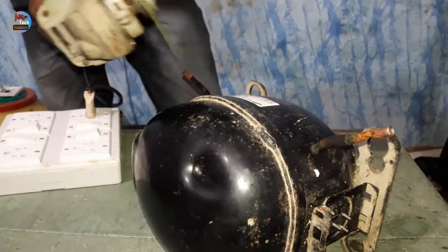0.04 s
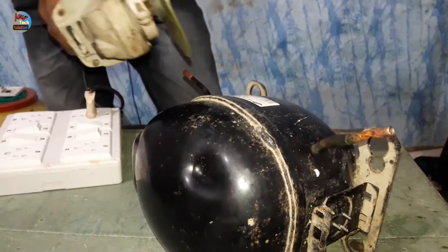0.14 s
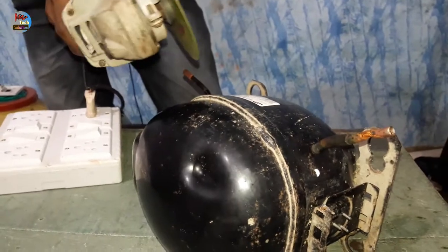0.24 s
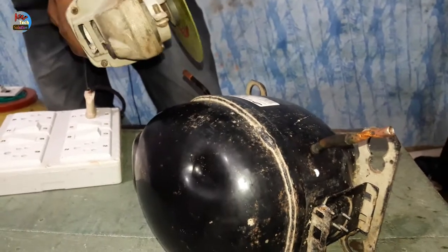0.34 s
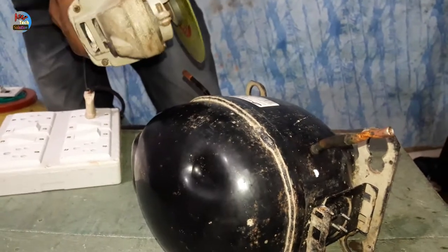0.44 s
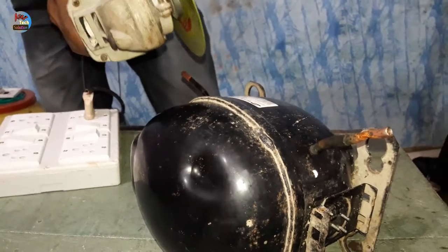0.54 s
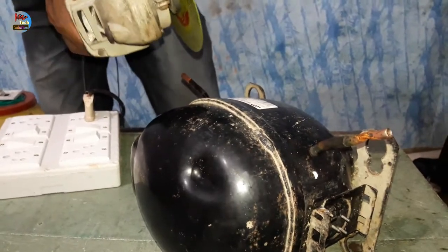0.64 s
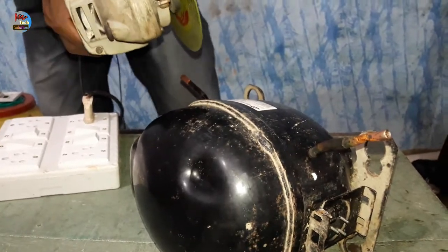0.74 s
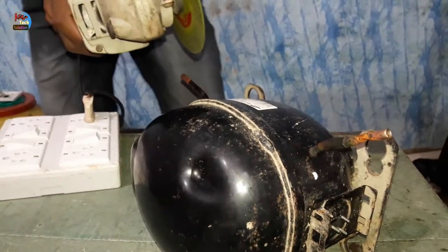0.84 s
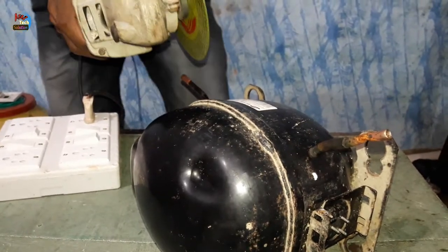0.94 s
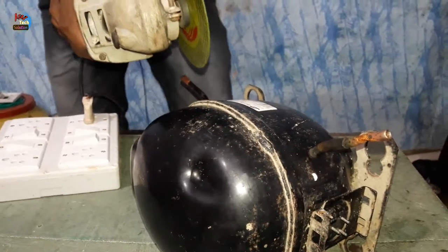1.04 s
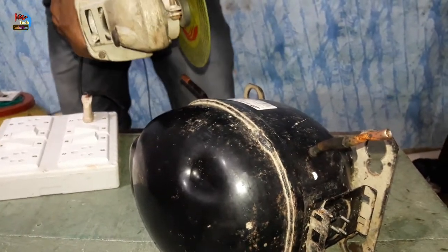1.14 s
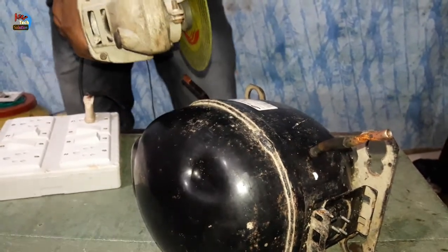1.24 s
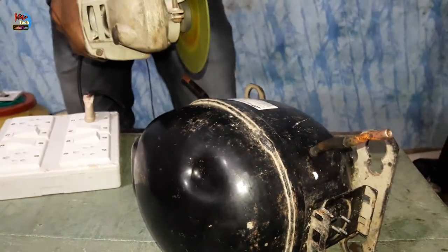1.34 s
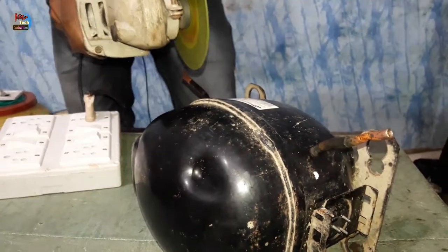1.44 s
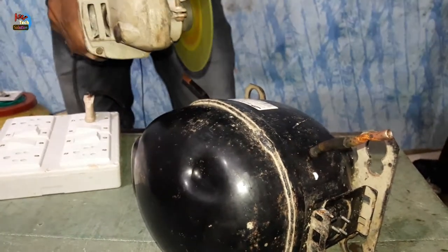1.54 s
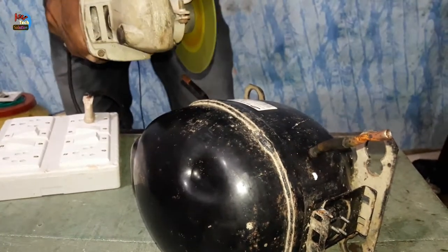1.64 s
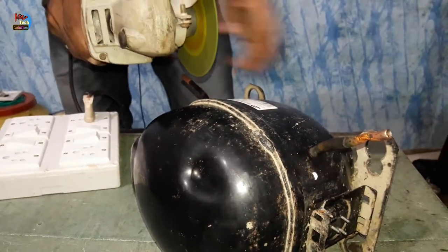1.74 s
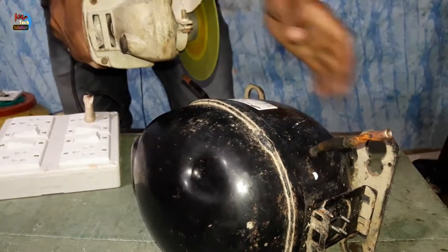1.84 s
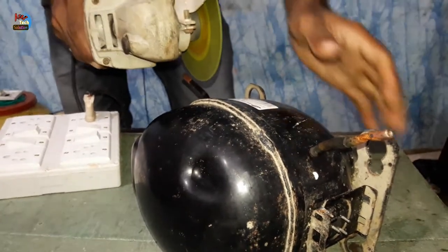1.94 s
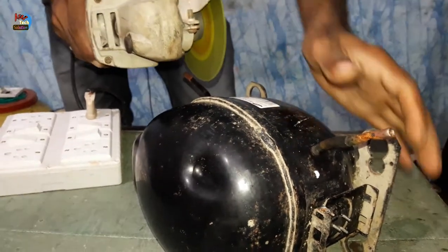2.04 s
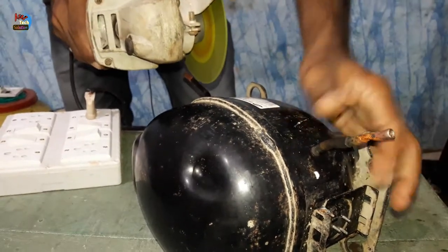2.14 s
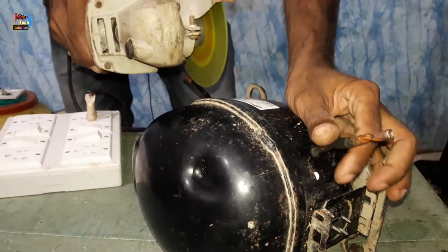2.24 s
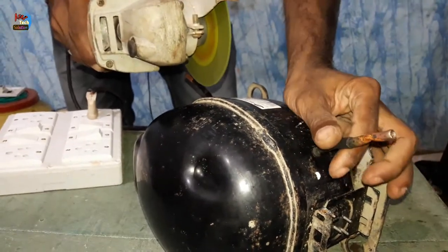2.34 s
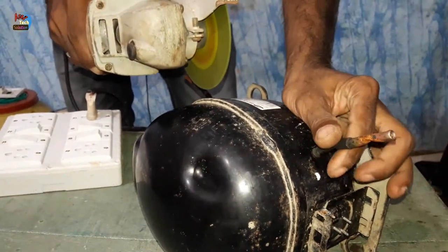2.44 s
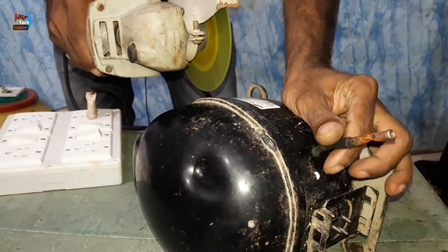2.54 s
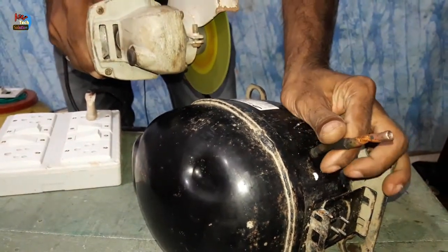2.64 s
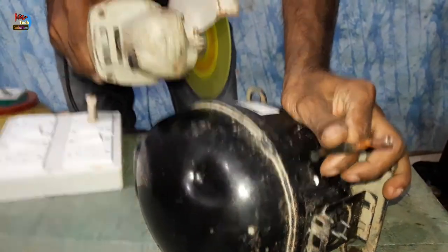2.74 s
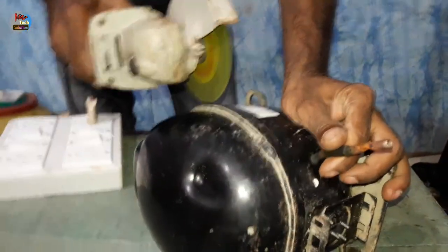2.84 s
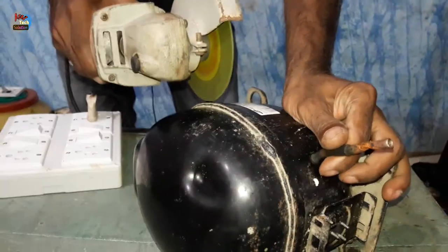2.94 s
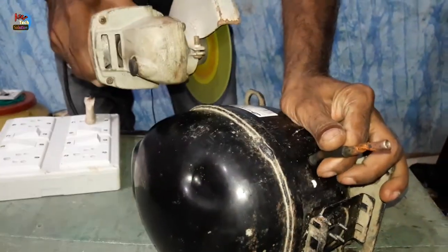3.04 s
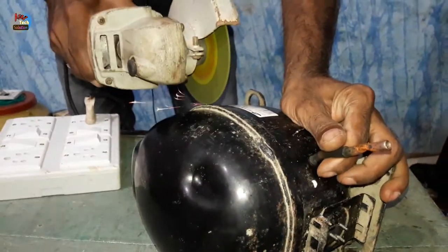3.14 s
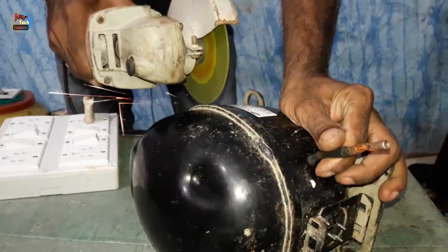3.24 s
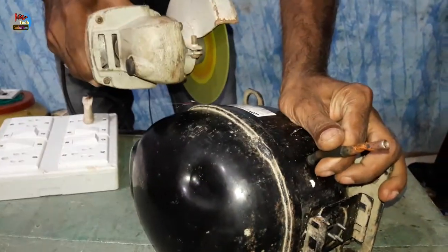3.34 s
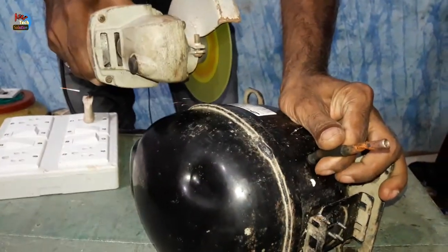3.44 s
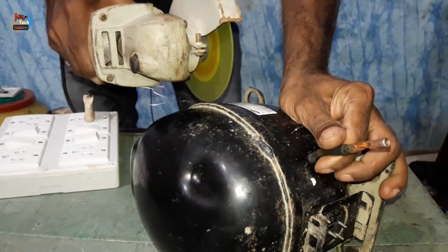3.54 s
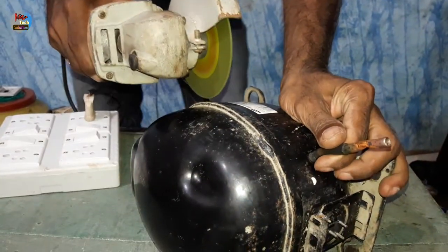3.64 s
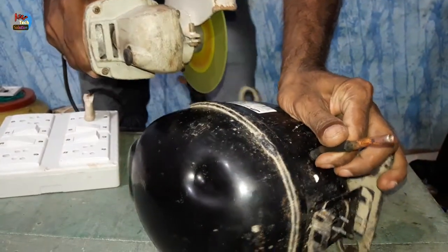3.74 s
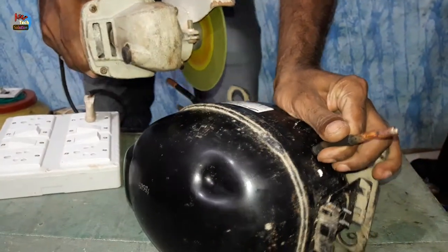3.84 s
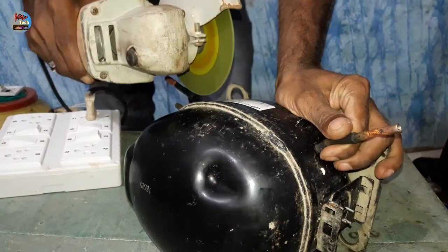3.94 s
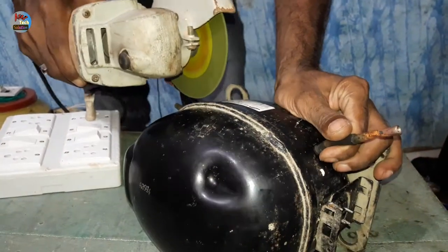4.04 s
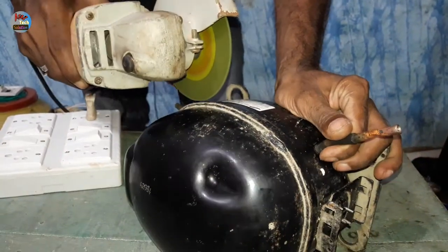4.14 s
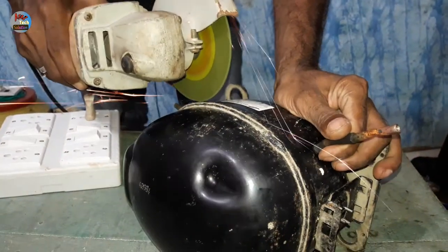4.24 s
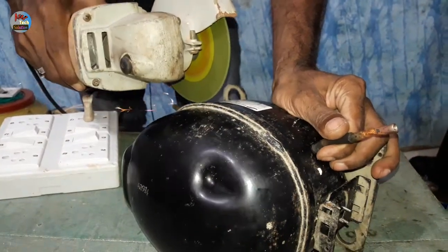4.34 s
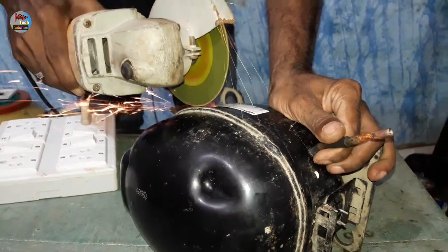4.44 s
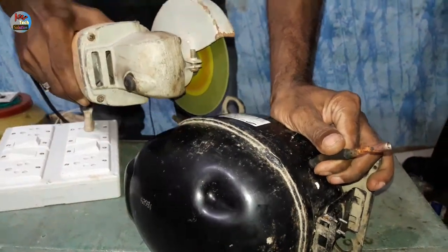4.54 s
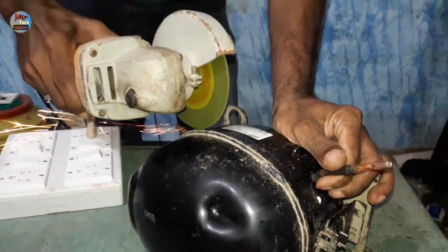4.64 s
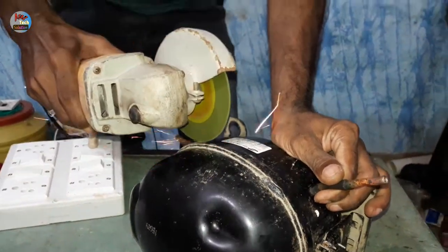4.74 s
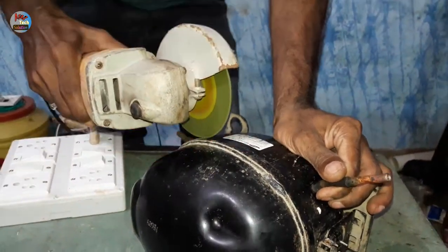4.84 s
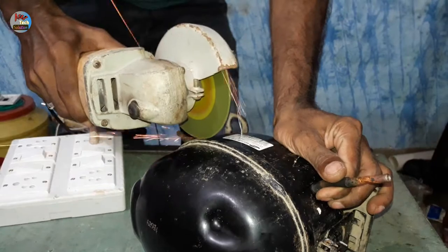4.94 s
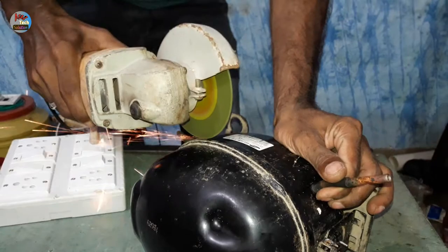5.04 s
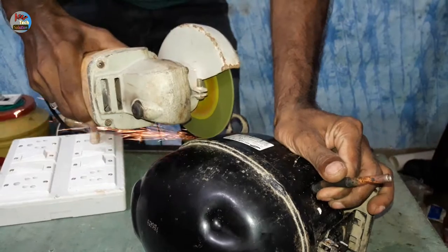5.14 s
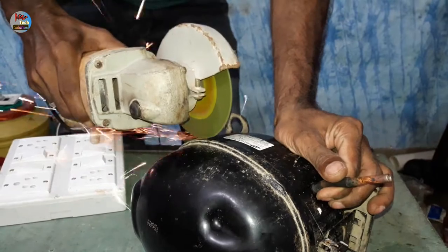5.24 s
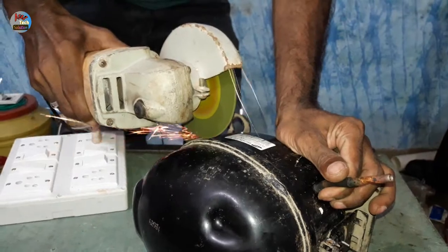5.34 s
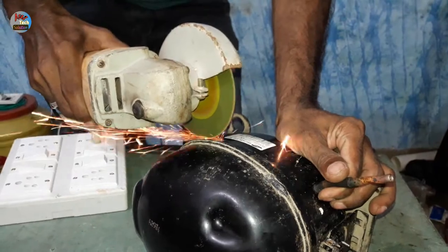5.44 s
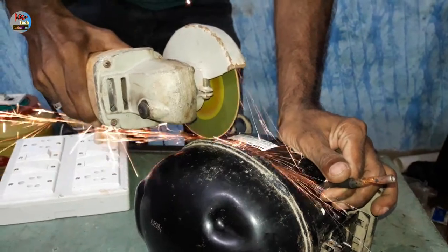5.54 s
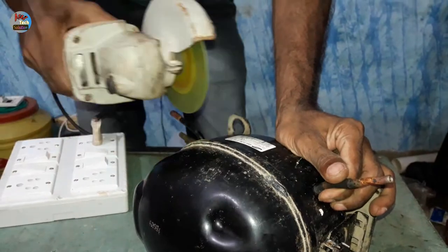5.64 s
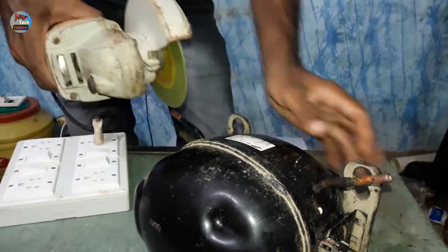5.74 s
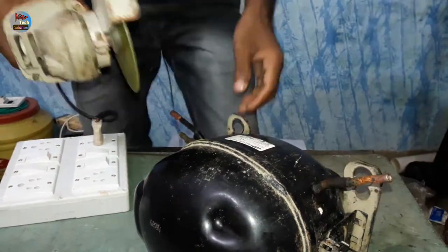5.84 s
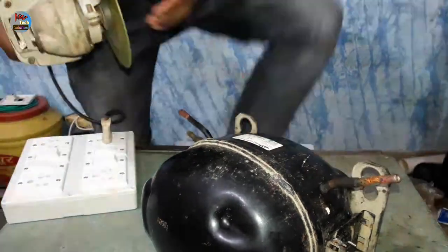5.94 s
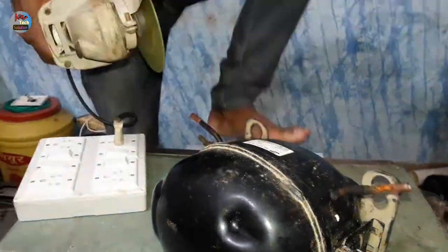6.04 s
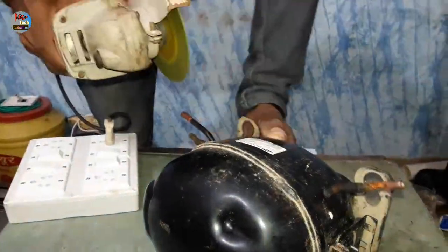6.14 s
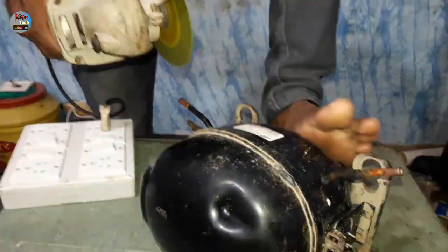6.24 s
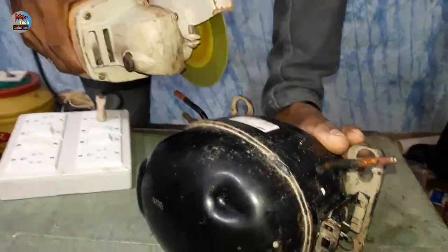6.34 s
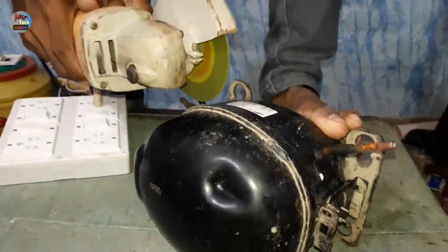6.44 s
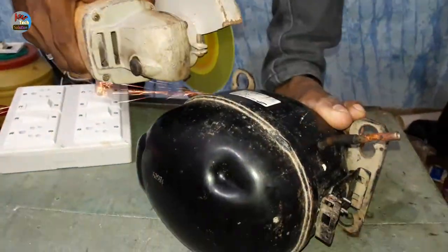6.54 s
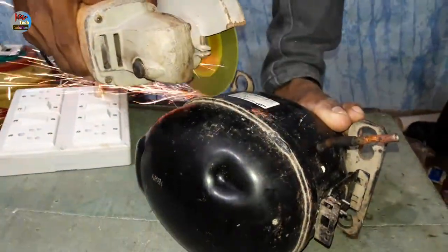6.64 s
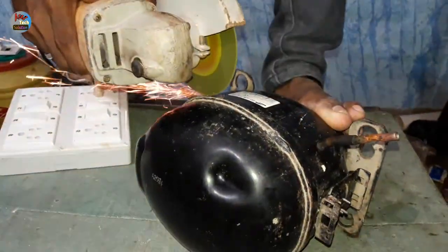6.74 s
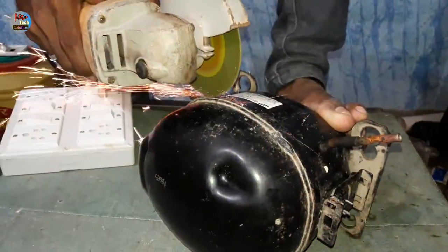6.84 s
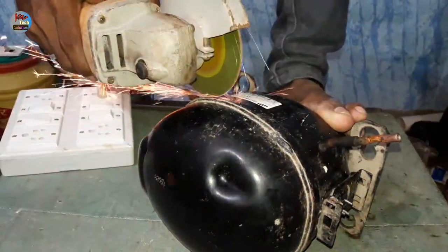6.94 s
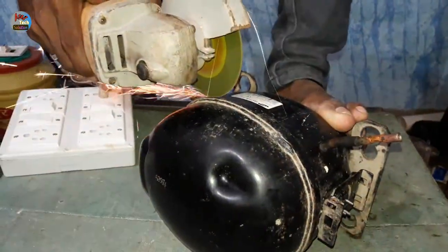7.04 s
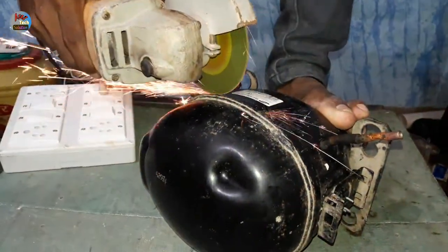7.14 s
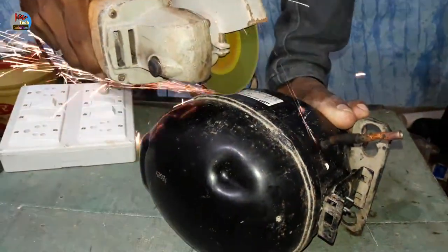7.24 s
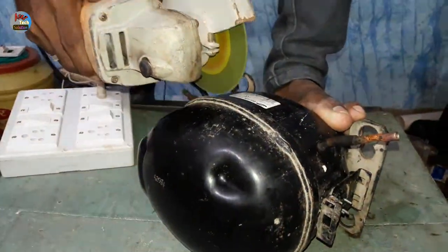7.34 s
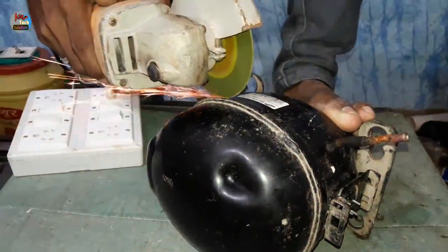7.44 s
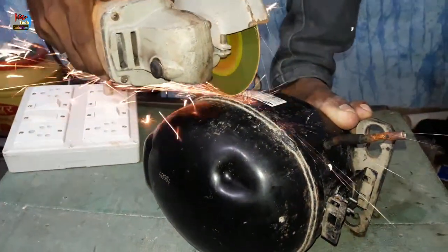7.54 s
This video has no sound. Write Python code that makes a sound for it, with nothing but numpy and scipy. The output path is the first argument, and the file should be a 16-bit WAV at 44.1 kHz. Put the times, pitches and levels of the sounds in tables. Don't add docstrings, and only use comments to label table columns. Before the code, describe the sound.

Quiet hum and faint hand ticks, then a power grinder starts with rattling gears, squeaks and whines, and repeatedly bites a hollow metal shell.

```python
import sys
import numpy as np
from scipy import signal
from scipy.fft import rfft, irfft
from scipy.io import wavfile
from scipy.ndimage import uniform_filter1d, minimum_filter1d, map_coordinates

SR = 44100
rng = np.random.default_rng(int(sys.argv[2]) if len(sys.argv) > 2 else 0)


def pcm_store(signal):
    levels = np.round(np.clip(np.atleast_2d(signal), -1, 1) * 32767)
    wavfile.write(sys.argv[1], SR, levels.astype(np.int16).T)


def gain_from_decibels(decibels):
    exponent = np.asarray(decibels, float) / 20
    return 10 ** exponent


N = 335160
TIME = np.arange(N) / SR
START_S = 1.2688


def rms_one(x):
    return x / np.sqrt(np.mean(x ** 2) + 1e-20)


def in_time(rows):
    s, *columns = np.transpose(rows)
    return [np.interp(TIME, s, column) for column in columns]


def coloured(x, spectrum):
    hz, level_db = np.transpose(spectrum)
    grid_hz = np.maximum(np.arange(N // 2 + 1) * SR / N, 1)
    shape_db = np.interp(np.log(grid_hz), np.log(hz), level_db, -90, -90)
    return rms_one(irfft(rfft(x) * gain_from_decibels(shape_db), N))


def drift(rate_hz):
    r = np.exp(-2 * np.pi * rate_hz / SR)
    wander = signal.lfilter([1], [1, -2 * r, r * r], rng.standard_normal(N + SR))
    return rms_one(wander[SR:])


def grains(per_s, spread_db):
    sizes = gain_from_decibels(spread_db * np.minimum(rng.exponential(1, N), 5)) * rng.choice([-1, 1], N)
    return sizes * (rng.random(N) < per_s / SR)


def resonances(x, modes):
    out = 0
    for k, (hz, width_hz, level_db) in enumerate(modes):
        r = np.exp(-np.pi * width_hz / SR)
        b = [(1 - r * r) / 2, 0, (r * r - 1) / 2]
        a = [1, -2 * r * np.cos(2 * np.pi * hz / SR), r * r]
        out = out + (-1) ** k * gain_from_decibels(level_db) * signal.lfilter(b, a, x)
    return rms_one(out)


def filtered(x, order, hz, kind="low"):
    return signal.sosfilt(signal.butter(order, hz, kind, fs=SR, output="sos"), x)


def add(track, at_s, piece):
    i = round(at_s * SR)
    track[i:i + len(piece)] += piece[:N - i]


def touching(rows, fade_s):
    return np.clip(np.minimum(TIME - rows[0][0], rows[-1][0] - TIME) / fade_s, 0, 1)


def delayed(x, lag_ms):
    return map_coordinates(x, [np.arange(N) - lag_ms * SR / 1000], order=3)


RUN_UP_S, ROLLING_SHARE = .2, .075


def spun_up():
    return 1 - (1 - ROLLING_SHARE) * np.exp(-np.maximum(TIME - START_S, 0) / RUN_UP_S)


# (time [s], length [s], disc ring [dB], shell ring [dB], loss of speed [%])
CUTS = [
    (3.198, 0.15, -30, -60, 0.44),
    (4.237, 0.3, -37.5, -43.5, 4.2),
    (4.668, 0.24, -37, -48, 2.32),
    (4.995, 0.31, -35.5, -47.5, 2.8),
    (5.267, .41, -35, -44, 5.7),
    (6.664, 0.3, -35, -43, 5.0),
    (6.908, 0.44, -33, -44, 8.9),
    (7.472, 0.24, -33, -42.5, 1.2),
]
BITE_S, LIFT_S, BITE_DB = .09, .022, -8
SAG_S = 0.0505


def pressure():
    disc, shell, load, loss = np.zeros((4, N))
    for s, length_s, disc_db, shell_db, percent in CUTS:
        touch = np.clip(np.minimum(TIME - s, s + length_s - TIME) / LIFT_S, 0, 1)
        bite = touch * gain_from_decibels(BITE_DB * np.exp(-np.maximum(TIME - s, 0) / BITE_S))
        disc, shell = disc + bite * gain_from_decibels(disc_db), shell + touch * gain_from_decibels(shell_db)
        load, loss = load + touch, loss + touch * percent / 100
    keep = np.exp(-1 / (SAG_S * SR))
    return disc, shell, np.minimum(load, 1), signal.lfilter([1 - keep], [1, -keep], loss)


# (frequency [Hz], level [dB per Hz])
SHOP_FLOOR = [(35, -37), (60, -10), (93, -10.5), (226, -11.5), (266, -15), (443, -6), (533, -15),
              (599, -13), (1100, -22.5), (1290, -23), (3580, -29), (3930, -28), (4320, -28), (9510, -32),
              (15500, -50)]
# (frequency [Hz], width [Hz], level [dB])
FAR_FAN = [(4000, 90, -3), (5140, 80, -12), (2800, 200, -12), (8700, 120, -16)]
# (frequency [Hz], rms level [dB])
HUM = [(48.4, -65), (143, -74), (272, -70.5), (339, -70.5), (385, -76), (493, -63.5), (543, -61),
       (4016, -75), (3870, -86), (5141, -85), (2794, -81)]
LATE_HUM = [(3050, -76), (2670, -79), (2891, -80), (3871, -86), (5146, -84), (6320, -81)]
# (time [s], level [dB])
GRIP = [
    (0.57, -76),
    (0.64, -60),
    (.69, -61),
    (.75, -58),
    (.82, -61),
    (0.88, -64),
    (0.92, -68),
    (1.0, -68),
]
# (frequency [Hz], level [dB per Hz])
GRIP_COLOUR = [(410, -36), (700, -8), (829, -12), (896, -8), (1430, -8), (1670, -7), (2140, -11),
               (4900, -10.5), (15600, -30)]
# (time [s], peak level [dB], pitch [Hz], time to fade by 60 dB [s])
TICKS = [
    (0.29, -60, 4100, 0.04),
    (0.392, -44.5, 3300, 0.016),
    (0.393, -48, 5050, 0.01),
    (0.666, -50, 1170, 0.04),
    (0.63, -52, 1940, 0.04),
    (0.667, -45, 1980, 0.037),
    (0.779, -50, 1830, 0.04),
    (0.946, -49, 4030, 0.008),
    (1.15, -42.5, 1110, 0.07),
    (1.171, -43, 700, 0.04),
]


def workshop():
    out = gain_from_decibels(-61 + drift(16)) * coloured(rng.standard_normal(N), SHOP_FLOOR)
    out += gain_from_decibels(-75) * resonances(rng.standard_normal(N), FAR_FAN)
    late = np.clip((TIME - 1.0) / .08, 0, 1)
    for lines, present in ((HUM, 1), (LATE_HUM, late)):
        for hz, level_db in lines:
            tone = np.sin(2 * np.pi * hz * TIME + hz / 8000 * drift(25))
            out += present * np.sqrt(2) * gain_from_decibels(level_db + 1.4 * drift(4.6)) * tone
    slide = coloured(grains(9000, spread_db=-3.0), GRIP_COLOUR)
    out += touching(GRIP, fade_s=.04) * gain_from_decibels(in_time(GRIP)[0]) * slide
    t = np.arange(3000) / SR
    cracks = uniform_filter1d(rng.standard_normal((len(TICKS), len(t))), size=14) * 2.0
    for (s, peak_db, hz, t60_s), crack in zip(TICKS, cracks):
        modes = sum(share * np.sin(2 * np.pi * ratio * hz * t)
                    for ratio, share in ((1, 1), (1.62, 0.31), (1.1, 0.78)))
        add(out, s, gain_from_decibels(peak_db - 5 - 60 * t / max(t60_s, .003)) * modes * (1 + .5 * crack))
    snap = uniform_filter1d(rng.standard_normal(len(t)), size=3)
    add(out, START_S - .0025, gain_from_decibels(-33 - 60 * t / .012) * snap)
    return out


# (time [s], bench lag [ms], bench part of the echo [0-1],
# guard facing us [0-1], echo boost [factor], lower guard ring [dB])
POSE = [(1.27, 0.21, 0.9, 0.37, 1.0, -4), (1.6, .26, 0.94, 0.1, 1.1, -5), (2.05, .29, 0.83, 0.3, 1.38, -5),
        (3.92, .3, 0.79, 0.1, 1.04, 0), (3.96, 0.29, 0.62, 0.76, 1.1, 0.5),
        (5.72, 0.29, 0.55, 0.5, 1.22, 0), (5.8, 0.32, 0.5, .7, 1.07, -6), (5.9, 0.27, 0.75, 0.9, 0.87, -5),
        (5.98, 0.21, 0.76, 1, 0.59, -2), (6.12, .21, 0.6, 0.95, 0.85, -4), (6.23, 0.26, 0.7, 1, 1.2, -12),
        (6.38, .262, 0.95, 1.03, 0.99, -12), (6.46, .3, 0.5, 1, 1.1, -9), (6.62, .29, 0.33, 0.8, 1.01, 3.5),
        (7.6, 0.29, 0.14, 0.76, 0.82, -2)]
# (time [s], peak level [dB], pitch [Hz])
THUMPS = [(2.16, -52, 150.2), (2.23, -52, 149.5), (2.72, -52, 90), (2.945, -47, 160), (3.09, -52, 130.2),
          (3.224, -43, 170), (3.292, -50, 170.4), (3.5, -53, 90.4), (3.68, -52, 70.0), (4.47, -57, 110),
          (4.72, -56, 120), (4.83, -51, 120.5), (5.089, -58, 130), (5.55, -51, 105), (6.1, -53, 118),
          (6.3, -57, 120.2), (6.4, -54, 160), (6.74, -48, 150.4), (7.32, -52, 130)]


def bench():
    lumps = rng.standard_normal(N) * gain_from_decibels(1.8 * drift(11))
    out = rms_one(filtered(lumps, 3, [100, 240], "band"))
    idle = gain_from_decibels(-66 - 4.3 * in_time(POSE)[2]) * spun_up() ** 2
    out *= idle + gain_from_decibels(-25) * pressure()[0]
    t = np.arange(3000) / SR
    for s, peak_db, hz in THUMPS:
        swell = t / .004 * np.exp(1 - t / 0.0037)
        add(out, s, gain_from_decibels(peak_db + 2.5) * np.sin(2 * np.pi * hz * t) * swell)
    return out


# (time [s], peak level [dB], ringing pitch [Hz])
SLAMS = [(1.2693, -16, 3460), (1.2918, -15, 4300), (1.3084, -14, 3380), (1.3207, -20, 5000),
         (1.3292, -17, 4440), (1.3586, -15, 4530), (1.3706, -15, 4300), (1.3798, -14, 5460),
         (1.3905, -12, 3140), (1.4, -15, 3360), (1.419, -15, 4300), (1.4295, -15, 3590),
         (1.4394, -14, 3440), (1.4494, -16, 4030), (1.47, -13, 4170), (1.4814, -15, 4120),
         (1.4914, -15, 4330), (1.5008, -16, 4290), (1.5123, -16, 4390), (1.5223, -15, 4340),
         (1.542, -15, 4260), (1.5522, -17, 3540), (1.5612, -13, 4430), (1.5706, -19, 4200),
         (1.5921, -20, 3590), (1.6011, -16, 3330), (1.651, -20, 3660)]
# (time [s], peak level [dB])
CRACKS = [(4.2078, -37), (4.4637, -36), (4.5274, -35), (4.687, -33), (4.7962, -34), (4.8451, -30),
          (4.923, -37), (5.2111, -36), (5.2564, -35), (5.2851, -32), (5.3695, -33), (5.5675, -34),
          (5.639, -30), (5.9112, -34), (6.1317, -35), (6.1911, -37), (6.4809, -35), (6.7495, -31),
          (6.8727, -34), (7.0563, -33), (7.1937, -34), (7.3579, -38), (7.4203, -38), (7.4963, -31)]


def knocks():
    out, t = np.zeros(N), np.arange(900) / SR
    roughness = uniform_filter1d(rng.standard_normal((len(SLAMS), len(t))), size=30)
    for (s, peak_db, hz), rough in zip(SLAMS, roughness):
        ring = np.sin(2 * np.pi * hz * t + 2.7 * rough) * np.minimum(t / .0012, 1)
        add(out, s, gain_from_decibels(peak_db - 2 - 60 * t / 0.017) * ring)
    cracks = np.diff(rng.standard_normal((len(CRACKS), len(t) + 1)))
    for (s, peak_db), crack in zip(CRACKS, cracks):
        add(out, s, gain_from_decibels(peak_db - 10 - 60 * t / .03) * crack)
    return out


# (time [s], peak level [dB], pitch [Hz])
SQUEAKS = [(2.0191, -16, 6280), (2.0793, -14, 6150), (2.1005, -16, 6140), (2.1193, -22, 6290),
           (2.1522, -14, 5920), (2.17, -14, 6300), (2.1981, -18, 6420), (2.2228, -16, 6230),
           (2.2415, -11, 6280), (2.3, -17, 6380), (2.3184, -16, 6410), (2.478, -23, 6540),
           (2.6975, -18, 5573), (2.959, -16.5, 5900), (3.0809, -27, 6090), (3.0996, -14, 5910),
           (3.157, -24, 6170), (3.2263, -12, 6000), (3.24, -13, 6200), (3.2975, -9, 5830),
           (3.5526, -16, 5740), (3.7017, -24, 6470), (3.791, -17, 6420), (3.8708, -15.5, 6240),
           (3.9506, -20, 6400), (4.5056, -17, 6300), (4.8435, -17.5, 6250), (6.3038, -20, 6096),
           (6.7478, -14, 5870), (7.0571, -15, 5754)]
# (time [s], peak level [dB])
SPARKS = [(1.8992, -31), (2.02, -26), (2.041, -24), (2.1008, -36), (2.1187, -26), (2.1521, -32),
          (2.2212, -34), (2.3896, -32), (2.4594, -32), (2.4794, -32), (2.5108, -33), (2.5298, -28),
          (2.6011, -26), (2.6655, -33), (2.6839, -31), (2.7807, -38), (2.8007, -40), (2.8326, -36),
          (2.9265, -34), (2.9598, -28), (2.9922, -31), (3.081, -34), (3.0995, -34), (3.1374, -33),
          (3.1564, -28), (3.2097, -33), (3.2272, -32), (3.2793, -36), (3.297, -26), (3.3424, -28),
          (3.4662, -36), (3.4901, -31), (3.523, -34), (3.553, -35), (3.5834, -32), (3.6014, -30),
          (3.7011, -38), (3.7206, -38), (3.7635, -38), (3.7899, -37), (3.8293, -31), (3.8732, -29),
          (3.9516, -32)]
# (time [s], pitch [Hz])
BRUSH_PITCH = [(1.3, 6220), (4.0, 6210), (5.7, 6350), (6.7, 5700)]
OCTAVE_DB, SPARK_UNDER_DB = -25, 6.5
CHATTER_PER_S, CHATTER_DB = 25, -23
STRAY_PER_S, STRAY_DB, STRAY_FROM_S, STRAY_TO_S = 9.8, -34, 4.0, 5.1


def squeaks():
    out, t = np.zeros(N), np.arange(500) / SR
    busy = pressure()[2] + 2 * (1 - spun_up()) * (TIME > START_S + .2)
    faint = TIME[rng.random(N) < CHATTER_PER_S * busy / SR]
    sparking = (TIME > STRAY_FROM_S) & (TIME < STRAY_TO_S)
    stray = TIME[(rng.random(N) < STRAY_PER_S / SR) & sparking]
    sparks = list(SPARKS) + [(s, STRAY_DB) for s in stray]
    # time, squeal dB, pitch (0: the usual one), octave dB
    rows = [(s, db, hz, db + OCTAVE_DB) for s, db, hz in SQUEAKS]
    rows += [(s, db + SPARK_UNDER_DB, 0, db) for s, db in sparks]
    rows += [(s, CHATTER_DB, 0, CHATTER_DB + OCTAVE_DB) for s in faint]
    shape = (t / 0.0015) ** 2 * np.exp(2 - 2 * t / 0.0016)
    for (s, peak_db, hz, octave_db), (a, b, c, d) in zip(rows, rng.random((len(rows), 4))):
        hz = hz or np.interp(s, *np.transpose(BRUSH_PITCH)) * (1 + 0.035 * (d - .5))
        phase = 2 * np.pi * (hz * t + a) + .45 * np.sin(2 * np.pi * (260 * t + b))
        octave = gain_from_decibels(octave_db + .8) * np.sin(2 * phase + 6 * c)
        add(out, s, shape * (gain_from_decibels(peak_db - 4.5) * np.sin(phase) + octave))
    return out


# (time [s], speed [turns per s], whine level [dB])
ROTOR = [(1.45, 520, -30.5), (1.72, 523, -27.5), (1.86, 523, -27.5), (1.99, 511, -33), (2.84, 509, -36.5),
         (4.12, 513, -36.5), (4.62, 511, -36), (4.87, 507, -33.5), (5.3, 507, -37), (5.8, 505, -36.5),
         (5.99, 490, -39.5), (6.26, 560, -40.5), (6.62, 543, -47.5), (6.95, 533, -39), (7.25, 538, -35),
         (7.32, 485, -42.5), (7.37, 530, -38.5), (7.46, 534, -36)]
# (frequency [Hz], width [Hz], level [dB])
DISC = [(5710, 170, 0), (6340, 200, -7), (3570, 90, -4), (4480, 300, -9), (9300, 500, -16)]
SHELL = [(2015, 50, 0), (1930, 40, -9), (2300, 55, -8), (310, 40, -16), (430, 80, -16)]
# (frequency [Hz], level [dB per Hz])
SPRAY = [(6500, -36), (10800, -16), (12000, 10), (13900, 6), (14800, -4), (15700, -8)]


def cutting():
    disc_turns = in_time(ROTOR)[0] / 3.3
    wobble = 1 + 0.15 * np.sin(2 * np.pi * np.cumsum(disc_turns) / SR)
    grit = grains(14000, spread_db=2.2) * wobble * gain_from_decibels(.6 * drift(58))
    disc, shell, *_ = pressure()
    shell = shell * gain_from_decibels(2 + .6 * drift(16))
    sing = np.sqrt(2) * gain_from_decibels(-4 + 2.5 * drift(20)) * np.sin(2 * np.pi * 2015 * TIME + 1.6 * drift(12))
    spray = gain_from_decibels(-19 + 1.5 * drift(25)) * coloured(grit, SPRAY)
    return disc * (resonances(grit, DISC) + spray) + shell * (gain_from_decibels(-1.5) * resonances(grit, SHELL) + sing)


# (time [s], gear rattle level [dB])
NEARNESS = [(1.27, -24), (1.47, -27.5), (1.66, -25), (2.03, -29.5), (3.56, -30.5), (3.92, -31.5),
            (3.95, -32), (4.0, -34.5), (5.7, -35), (6.08, -36), (6.2, -34), (7.3, -34), (7.6, -35.5)]
# (frequency [Hz], level [dB per Hz])
DRONE = [(88, -60), (150, -43.5), (250, -25), (441, -18), (505, -12.5), (522, -8.5), (552, -12.5),
         (765, -6), (1070, -13), (1480, -15.5), (2200, -13), (2860, -19), (4840, -120)]
RATTLE = [(710, -81), (1200, -4), (1660, -4.5), (1990, -4), (2170, -8), (2880, 2.5), (4220, 4), (4960, 0.5),
          (5780, 3), (6630, -9.5), (7500, -12), (9750, -15), (16500, -120)]
HISS = [(3820, -13.5), (6500, 3), (7660, 2), (8300, -1.5), (9100, 1.5), (9820, 1.5), (10100, -3.5),
        (11300, -8.5), (12800, -7), (13400, -16.5), (15600, -21)]
# (frequency [Hz], width [Hz], level [dB])
GEARBOX = [(4300, 280, 0), (3400, 200, -5), (5200, 260, -6), (6300, 150, -9)]
GUARD = [(6480, 93, 4), (6080, 200, -1.5), (7860, 150, -15), (10050, 510, -7), (10100, 120, -2),
         (12500, 250, -13)]
GUARD_LOW = [(5660, 150, 0)]
THROB_HZ, THROB_PEAK_S = 100, 1.3315
JOLT_DB, JOLT_S = 5, 0.047
FAN_POWER = 2.6


def running(throb, guard_db, low_db):
    lift_db = pressure()[2]
    rattle_db = in_time(NEARNESS)[0] + lift_db
    jolt_db = JOLT_DB * np.exp(-np.abs(TIME - START_S) / JOLT_S)
    drone_db = -1 - 5 * throb + jolt_db - lift_db / 2
    hiss_db = -0.5 + FAN_POWER * 20 * np.log10(spun_up()) - lift_db
    since = (THROB_HZ * (TIME - THROB_PEAK_S) + .2) % 1
    peaks = np.e * since / .13 * np.exp(-since / .13)
    torque = 1 - throb + 1.7 * throb * peaks * gain_from_decibels(1.8 * drift(60))
    torque /= np.sqrt(uniform_filter1d(torque ** 2, size=2000))
    shake = gain_from_decibels(0.65 * drift(51))
    rattle = coloured(grains(15000, spread_db=1.5), RATTLE) * torque * gain_from_decibels(2 - 5 * throb)
    gearbox = resonances(grains(8000, spread_db=0.0) * torque, GEARBOX) * throb * gain_from_decibels(-3.5)
    gearbox = filtered(gearbox, 2, 7500)
    pelting = grains(9000, spread_db=4.0) * torque * gain_from_decibels(1.4 * drift(70))
    guard = resonances(pelting, GUARD) - resonances(pelting, GUARD_LOW) * gain_from_decibels(low_db - 2)
    guard = filtered(guard * gain_from_decibels(guard_db - 3.5), 4, 13600)
    drone = coloured(grains(12000, spread_db=1.5), DRONE) * torque ** 0.37 * gain_from_decibels(drone_db)
    hiss = coloured(rng.standard_normal(N), HISS) * torque ** 0.28 * gain_from_decibels(hiss_db + 0.5 * drift(22))
    return gain_from_decibels(rattle_db - 1.0) * shake * (rattle + gearbox + guard + drone + hiss)


# (multiple of speed, level [dB])
OVERTONES = [(2, -17), (3, -15.5)]
BLADES = [(28, -62), (31, -60)]
WHINE_POWER = 4.2
OVERTONE_FOLLOWS, WHINE_MEAN_DB = 0.84, -38
STUMBLE_DB, STUMBLE_S = -4, 0.012
PINION_TEETH, GEAR_WHISTLE = 12, 21


def whine(throb, blades_db):
    turns, level_db = in_time(ROTOR)
    *_, load, loss = pressure()
    stumble = sum(np.exp(-((TIME - cut[0]) / STUMBLE_S) ** 2) for cut in CUTS[2:])
    level_db = level_db + STUMBLE_DB * stumble + WHINE_POWER * 20 * np.log10(spun_up())
    turns = turns * spun_up() * (1 - loss)
    phase = 2 * np.pi * np.cumsum(turns) / SR + load * .7 * drift(14)
    out = np.sin(phase + 0.13 * drift(110)) * gain_from_decibels(level_db + (0.05 + 2.0 * load) * drift(31))
    cleared_db = .45 * in_time(POSE)[4]
    overtone_db = WHINE_MEAN_DB + OVERTONE_FOLLOWS * (level_db - WHINE_MEAN_DB)
    for multiple, order_db in OVERTONES:
        tone = np.sin(multiple * phase + 0.39 * drift(24))
        out += tone * gain_from_decibels(order_db + overtone_db - cleared_db * (multiple < 3) + 1.4 * drift(6.4))
    for multiple, order_db in BLADES:
        tone = np.sin(multiple * phase + 1.3 * drift(50))
        out += tone * gain_from_decibels(order_db + blades_db + 2.5 * drift(8))
    mesh = PINION_TEETH * phase + drift(110)
    howl = np.sin(mesh) * gain_from_decibels(-31.5) * touching([[1.31], [1.46]], 0.088)
    whistle = np.sin(GEAR_WHISTLE / PINION_TEETH * mesh) * gain_from_decibels(-30)
    howl += whistle * touching([[1.32], [1.43]], 0.024)
    return np.sqrt(2) * (out + howl * gain_from_decibels(3 * drift(60)) * throb ** 3)


ECHO_SHARE, RAISED_SHARE, LOWER_S = 0.44, .25, 0.99
SHELL_LAG_MS = .34
INRUSH_THROB, INRUSH_SLIP, IDLE_THROB, LOAD_THROB = .78, .12, .06, .07


def scene():
    lag_ms, bench_part, facing, boost, low_db = in_time(POSE)
    echo = ECHO_SHARE * boost * np.interp(TIME, [START_S, START_S + LOWER_S], [RAISED_SHARE, 1])
    bench_share, shell_share = echo * bench_part, echo * (1 - bench_part)
    inrush = INRUSH_THROB * np.tanh((1 - spun_up()) / INRUSH_SLIP)
    throb = np.clip(inrush + IDLE_THROB + LOAD_THROB * pressure()[2], 0, 1)
    guard_db = -14 + 15.5 * facing
    blades_db = -12 * facing - 14 * np.clip((TIME - 5.3) / .2, 0, 1)
    on = np.clip((TIME - START_S) / 0.0011, 0, 1)
    tool = on * (running(throb, guard_db, low_db) + knocks() + squeaks() + cutting())
    tool = filtered(tool, 2, 110, "high")
    treble = tool - .7 * uniform_filter1d(tool, size=7)
    echoes = bench_share * delayed(treble, lag_ms) + shell_share * delayed(tool, SHELL_LAG_MS)
    heard = (tool + echoes) / np.sqrt(1 + (bench_share + shell_share) ** 2)
    heard += on * (whine(throb, blades_db) + bench())
    ducked = 1 - on * (1 - gain_from_decibels(-21))
    mono = heard + ducked * workshop()
    return np.stack([mono, mono])


def band_limit(x):
    return signal.sosfilt(signal.butter(12, 15710, fs=SR, output="sos"), x)


# (time [s], gap [s], fade-in [s], depth [dB])
GAPS = [
    (1.304, 0.00359, .002, -9),
    (3.9246, 0.0085, 0.013, -65),
]
CEILING = .215


def record(dry):
    gain = np.ones(N)
    for s, gap_s, fade_s, depth_db in GAPS:
        back = np.clip((TIME - s - gap_s) / fade_s, 0, 1) + (TIME < s)
        gain *= gain_from_decibels(depth_db) + (1 - gain_from_decibels(depth_db)) * back
    room = np.minimum(CEILING / (np.abs(dry * gain).max(axis=0) + 1e-9), 1)
    gain *= uniform_filter1d(minimum_filter1d(room, size=61), size=61)
    return band_limit(dry * gain)


dry = scene()
out = record(dry)
pcm_store(out)
```